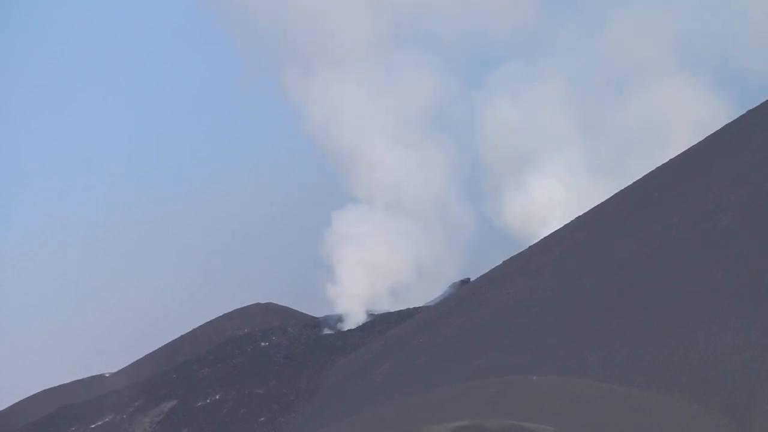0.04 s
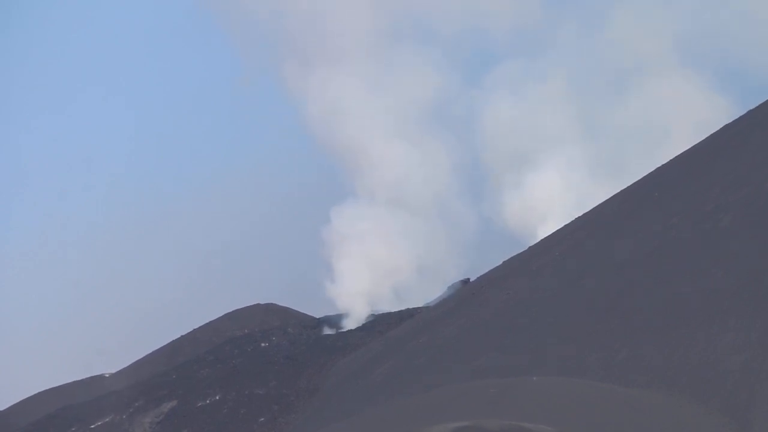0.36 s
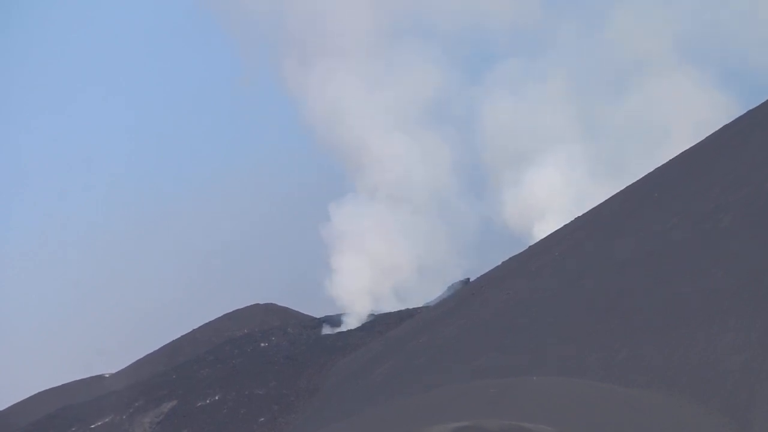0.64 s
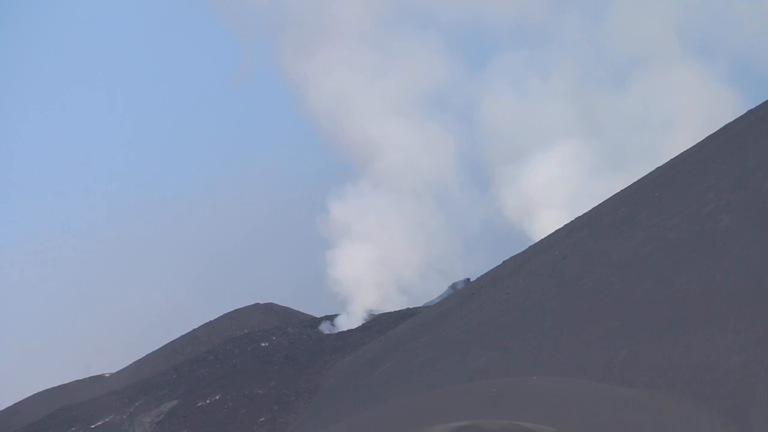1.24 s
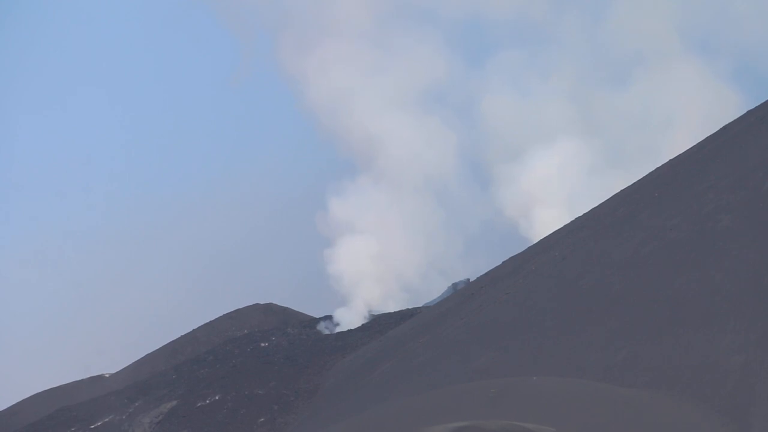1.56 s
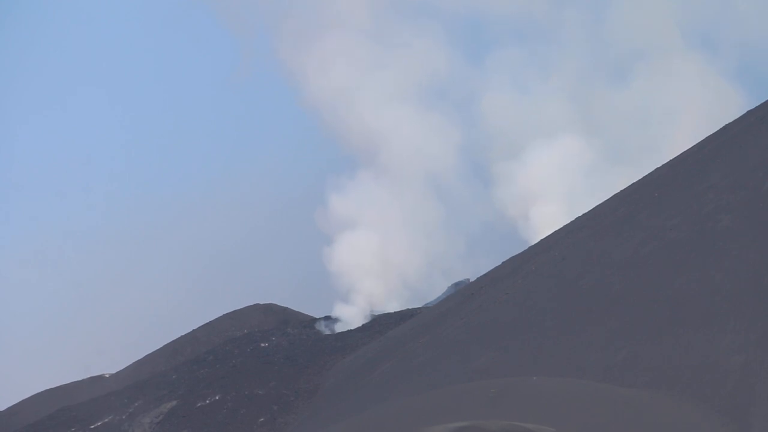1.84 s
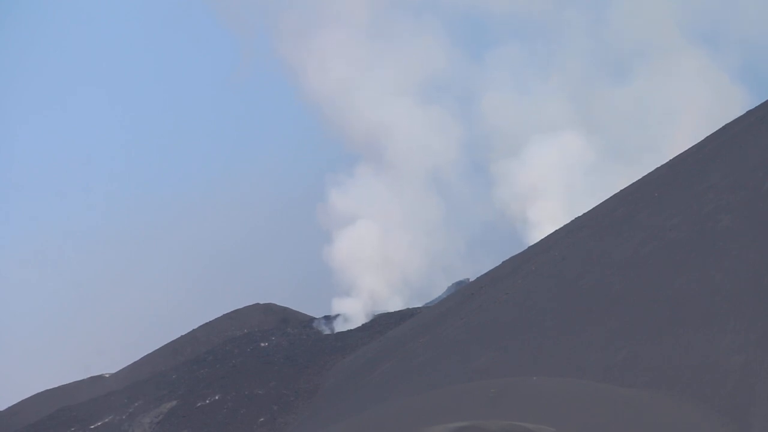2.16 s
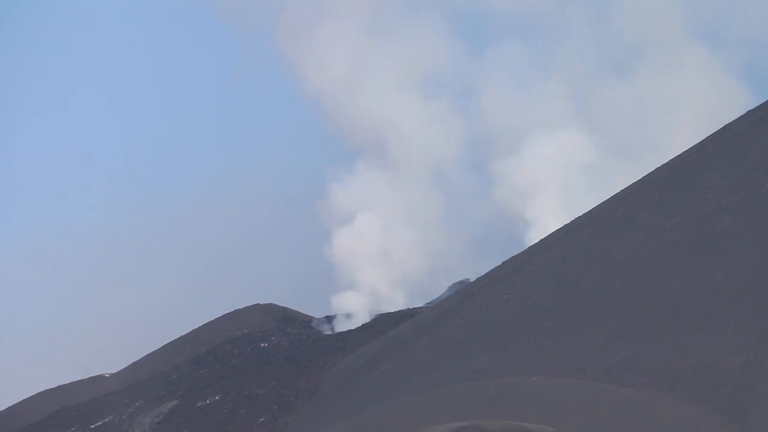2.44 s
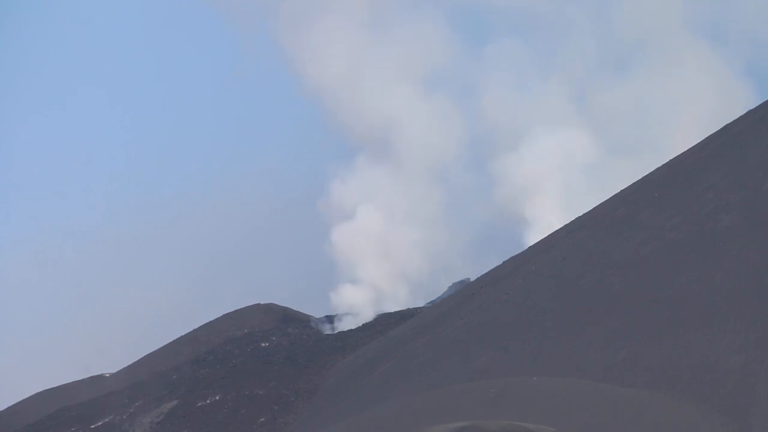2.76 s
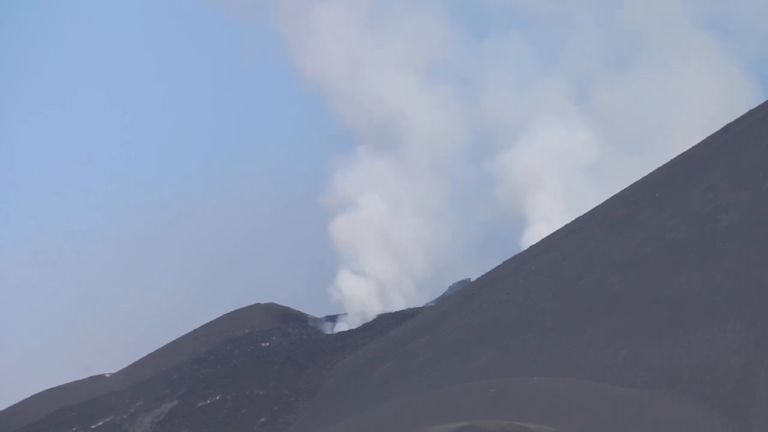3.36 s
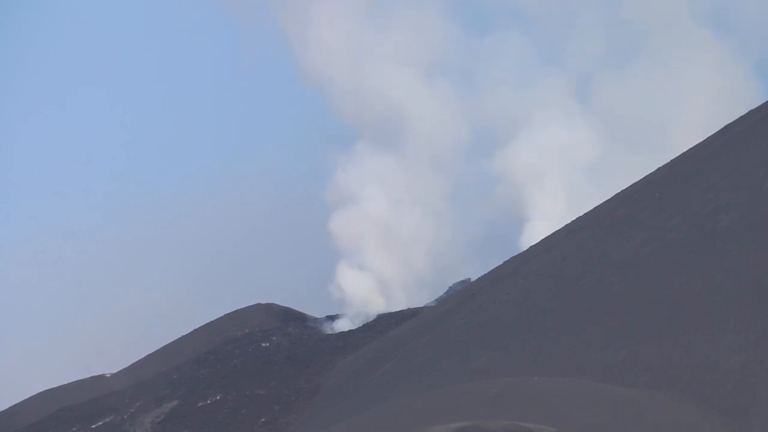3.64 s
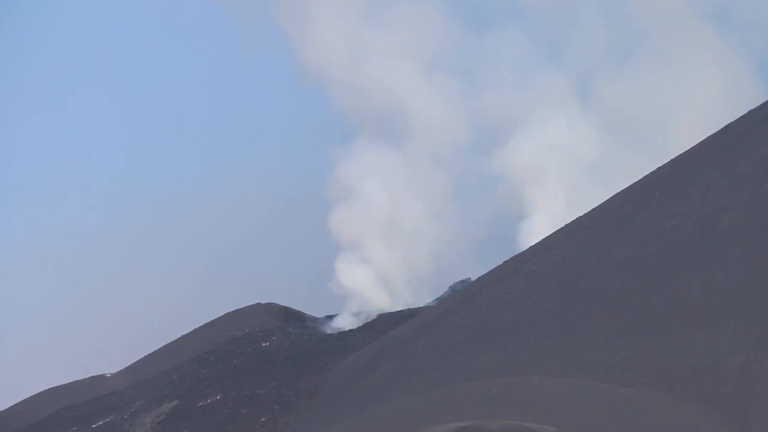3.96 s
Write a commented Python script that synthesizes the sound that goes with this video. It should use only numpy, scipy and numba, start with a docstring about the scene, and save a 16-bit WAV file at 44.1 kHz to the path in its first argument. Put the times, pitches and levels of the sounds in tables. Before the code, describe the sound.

A distant volcanic vent roars over a throbbing low rumble, with wind buffeting the microphone.

```python
"""A far-off roar over a throbbing rumble, with dull thuds, wind buffets, faint ticks and hiss.
The roar is a volcanic vent: a turbulent gas jet coloured by crater resonances, its treble lost in air.
Gas throbs in the conduit and bursts in the vent. Gusts shed eddies on the two microphone ports.
Gain control ducks the whole mix, recorder hiss included, when the sound swells."""
import sys
import numpy as np
from scipy import signal
from scipy.fft import rfft, irfft
from scipy.io import wavfile
from numba import njit

SR = 44100
rng = np.random.default_rng(int(sys.argv[2]) if len(sys.argv) > 2 else 0)


def store_pcm(level_fs):
    """Save levels as 16-bit WAV."""
    pcm = np.round(np.clip(level_fs, -1, 1) * 32767).astype(np.int16)
    wavfile.write(sys.argv[1], SR, np.atleast_2d(pcm).T)


N = 176400

# Gas jet spectrum. Each row: frequency in Hz, relative density in dB.
JET_SPECTRUM = [(60, -22), (110, -8), (170, 0.5), (260, -2.5), (330, -1), (480, -1.5), (600, -5.5),
                (950, -9.5), (1150, -15.5), (1450, -19.5), (1700, -23.5), (2100, -25), (2600, -36),
                (2900, -39), (3250, -49.5), (4200, -73.5), (7000, -120)]
# Crater resonances. Each row: centre in Hz, width in Hz, lift in dB.
CRATER_MODES = [(311, 22, 3.5), (393, 36.5, 4.5), (493, 15, 1), (763, 35, 3.5), (989, 85, 4.5),
                (1275, 110, 4.5), (1456, 92, 5), (1620, 70, 3)]
# Diffuse share of the jet, scattered by the slopes. Each row: frequency in Hz, side minus mid in dB.
SLOPE_SCATTER = [(100, -46), (450, -25.5), (750, -16), (1200, -13), (2000, -10.5), (3000, -10)]
# Force of the jet. Each row: time in seconds, relative level in dB.
JET_FORCE = [(0, -0.5), (.45, -1.5), (.82, 2.5), (1.02, -0.1), (1.3, .4), (1.8, -1.44), (2.12, -1.3),
             (2.35, 2.8), (2.55, 6), (2.68, 5), (2.8, 6.5), (2.97, 1.5), (3.2, 2.4), (3.5, 2.65),
             (3.75, 1.5), (3.92, 3.5), (4, 2.5)]
# Extra gain of the jet's treble. Each row: time in seconds, gain in dB.
JET_TREBLE = [(0, .5), (.8, -.3), (1.05, 2), (1.5, -1), (2.1, -1.2), (2.35, -1), (2.62, -5.5), (2.8, -.5),
              (3.0, 3.2), (3.3, 0.5), (3.7, 2.5), (4, 3.5)]
# Conduit rumble spectrum. Each row: frequency in Hz, relative density in dB.
RUMBLE_SPECTRUM = [(12, -25.5), (22, -12.5), (38, -5.5), (55, -2.5), (72, 3.5), (86, 0.5), (100, -1),
                   (130, -3.5), (165, -13), (260, -29), (600, -67.5), (3000, -130)]
# Conduit pressure. Each row: time in seconds, relative level in dB.
CONDUIT_PRESSURE = [(0, 2), (.45, -4.5), (.57, 4), (.67, 2), (.75, 1.5), (1.0, -0.5), (1.35, 1),
                    (1.87, -3.5), (1.97, -1.5), (2.2, -1), (2.55, 6), (2.85, 5), (3.03, -2), (3.24, 4.5),
                    (3.4, 0), (3.55, 0.5), (3.8, -4), (4, -1)]
# Recorder hiss spectrum. Each row: frequency in Hz, relative density in dB.
HISS_SPECTRUM = [(1000, 0), (4000, 0), (7000, -3), (11000, -5.5), (15500, -9.5)]
# Gusts. Each row: centre in seconds, half-width in seconds, relative level in dB, left minus right in dB.
PORT_GUSTS = [(0.404, 0.087, -8.5, 2), (0.522, .035, -5, 1), (.83, 0.048, 2.5, 6), (1.178, 0.052, 2, 6.5),
              (1.358, .035, -0.5, 1), (1.66, 0.035, -1.5, 5), (1.994, 0.044, 2.5, 2),
              (2.357, .04, -5.5, 0.5), (2.54, .03, 6, 6), (2.835, 0.056, 2.5, 2), (3.074, 0.077, -4, 0),
              (3.331, 0.052, 3, -5), (3.535, 0.046, 5, -5), (3.615, 0.041, 8.5, 12.5),
              (3.745, 0.029, 6, 11), (3.955, 0.091, 6.5, -1)]
# Wind buffet spectrum. Each row: frequency in Hz, relative density in dB.
BUFFET_SPECTRUM = [(15, -22.5), (45, -10.5), (90, -1), (180, -1.5), (260, -7), (380, -19.5), (520, -22.5),
                   (900, -38.5), (2500, -78.5), (6000, -130)]
# Gas bursts. Each row: peak time in seconds, envelope peak in dB.
GAS_BURSTS = [(0.715, -14.5), (.752, -15.5), (1.32, -11), (1.432, -12), (1.969, -14), (2.053, -9.5),
              (2.298, -8.5), (2.452, -5), (2.544, -4), (2.634, -3), (3.195, -14.5), (3.428, -11.5)]
# Ticks near the microphone. Each row: start in seconds, relative level in dB.
NEAR_TICKS = [(.7744, -53), (1.439, -43), (1.613, -45), (1.624, -41.5)]
# Tick spectrum. Each row: frequency in Hz, relative density in dB.
TICK_SPECTRUM = [(1500, -22), (3500, -2), (6500, 0), (10000, -9), (15000, -15)]
# Vent-to-port response. Each row: frequency in Hz, right lead in radians, right minus left in dB.
PORT_RESPONSE = [(30, 0.3, -0.5), (90, .2, 0.8), (300, .03, 0.4), (550, .12, 0.4), (1000, 0.27, 0.5),
                 (2000, 0.58, 2), (3000, 0.76, 2)]

TIME_S = np.arange(N) / SR
FREQ_HZ = np.maximum(np.arange(N // 2 + 1) * SR / N, 1)


def undb(db):
    """Decibels to gain."""
    return 10 ** (np.asarray(db) / 20)


def curve(rows):
    """Linear interpolation of (s, value) rows, per sample."""
    return np.interp(TIME_S, *np.array(rows).T)


def colour(rows):
    """Gain per bin from (Hz, dB) rows."""
    hz, db = np.array(rows).T
    return undb(np.interp(np.log(FREQ_HZ), np.log(hz), db))


def noise(gain):
    """Unit-rms noise with the given spectrum."""
    x = irfft(gain * np.exp(2j * np.pi * rng.random(len(gain))), N)
    return x / x.std()


def filtered(x, gain):
    """Apply a gain per bin."""
    return irfft(rfft(x) * gain, N)


def drift(rate_hz):
    """Smooth unit-rms random drift."""
    return noise(np.exp(-.5 * (FREQ_HZ / rate_hz) ** 2))


def gas_jet(level_db=-20.5, flutter_db=0.34, flicker_db=0.28, low_hz=560, treble_hz=1150):
    """Turbulent gas rings the crater, deeper when it blows hard; the whole flutters, each band flickers."""
    crater_db = sum(db / (1 + (2 * (FREQ_HZ - hz) / width_hz) ** 2) for hz, width_hz, db in CRATER_MODES)
    spectrum = colour(JET_SPECTRUM) * undb(crater_db)
    mid = noise(spectrum)
    side = filtered(noise(spectrum), colour(SLOPE_SCATTER))
    pair = np.array([mid + side, mid - side])
    low = 1 / (1 + (FREQ_HZ / low_hz) ** 6)
    high = 1 / (1 + (treble_hz / FREQ_HZ) ** 6)
    force_db = curve(JET_FORCE)
    bands = [(low, 1.12 * force_db),
             (1 - low - high, 0.94 * force_db),
             (high, force_db + curve(JET_TREBLE))]
    roar = sum(filtered(pair, band) * undb(db + flicker_db * drift(rate_hz=12)) for band, db in bands)
    return roar * undb(level_db + flutter_db * drift(rate_hz=14))


def conduit_rumble(level_db=-19.5, throb_db=0.9, side_db=-20.5):
    """The gas column in the conduit throbs with the pressure."""
    mid = noise(colour(RUMBLE_SPECTRUM))
    side = undb(side_db) * noise(colour(RUMBLE_SPECTRUM))
    envelope_db = level_db + curve(CONDUIT_PRESSURE) + throb_db * drift(rate_hz=14)
    return np.array([mid + side, mid - side]) * undb(envelope_db)


def recorder_hiss(level_db=-59.5, common_db=-15):
    """Steady hiss in each channel, plus a weak part common to both."""
    spectrum = colour(HISS_SPECTRUM)
    separate = np.array([noise(spectrum) for _ in range(2)])
    return undb(level_db) * (separate + undb(common_db) * noise(spectrum))


def wind_buffets(level_db=-23, breeze_db=-12.5, eddy_db=1.5):
    """Gusts over a light breeze shed eddies on each port separately, often harder on one side."""
    sides = np.array([[.5], [-.5]])
    gust_power = sum(undb(db + pan_db * sides) ** 2 * np.exp(-((TIME_S - at_s) / half_width_s) ** 2)
                     for at_s, half_width_s, db, pan_db in PORT_GUSTS)
    spectrum = colour(BUFFET_SPECTRUM)
    eddies = np.array([noise(spectrum) * undb(eddy_db * drift(rate_hz=32)) for _ in range(2)])
    return eddies * np.sqrt(undb(breeze_db) ** 2 + gust_power) * undb(level_db)


def gas_bursts(centre_hz=96, swell_s=0.0046, decay_s=0.011):
    """Slugs of gas burst in the vent: dull thuds of two or three cycles."""
    thuds = np.zeros(N)
    for at_s, db in GAS_BURSTS:
        pitch_hz = centre_hz * rng.normal(1, 0.034)
        phase_rad = rng.normal(0, .5)
        age_s = TIME_S - at_s
        envelope = np.exp(-.5 * (np.minimum(age_s, 0) / swell_s) ** 2 - np.maximum(age_s, 0) / decay_s)
        thuds -= undb(db) * envelope * np.sin(2 * np.pi * pitch_hz * age_s + phase_rad)
    return thuds


def ticks(decay_s=.0015):
    """Tiny dry ticks, perhaps ash grains on the housing."""
    envelope = sum(undb(db) * (TIME_S >= at_s) * np.exp(-np.abs(TIME_S - at_s) / decay_s)
                   for at_s, db in NEAR_TICKS)
    return noise(colour(TICK_SPECTRUM)) * envelope / 2


def at_ports(pair):
    """Vent sound reaches the right port slightly earlier and brighter."""
    hz, lead_rad, db = np.array(PORT_RESPONSE).T
    lead_rad, db = (np.interp(np.log(FREQ_HZ), np.log(hz), column) for column in (lead_rad, db))
    right = undb(db / 2) * np.exp(.5j * lead_rad)
    return filtered(pair, np.array([1 / right, right]))


def scene():
    """Distant vent; wind, ticks and hiss at the microphone."""
    vent = gas_jet() + conduit_rumble() + gas_bursts()
    return at_ports(vent) + wind_buffets() + ticks() + recorder_hiss()


@njit
def follow_level(x, level, attack_s, release_s):
    """One-pole follower with separate rise and fall times."""
    levels = np.empty(len(x))
    for i in range(len(x)):
        lag_s = attack_s if x[i] > level else release_s
        level += (x[i] - level) / (lag_s * SR)
        levels[i] = level
    return levels


def record(dry):
    """Gain control turns loud swells down; a steep low-pass cuts the top."""
    threshold, ratio, cutoff_hz = float(undb(-13.5)), 2.67, 15740
    level = follow_level(np.abs(dry).max(axis=0), threshold, attack_s=0.03, release_s=0.2)
    gain = np.minimum(threshold / level, 1) ** (1 - 1 / ratio)
    lowpass = signal.ellip(10, .1, 80, cutoff_hz, fs=SR, output="sos")
    return signal.sosfilt(lowpass, dry * gain)


dry = scene()
out = record(dry)
store_pcm(out)
```